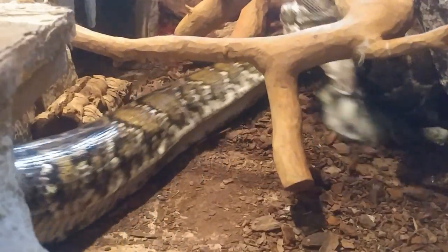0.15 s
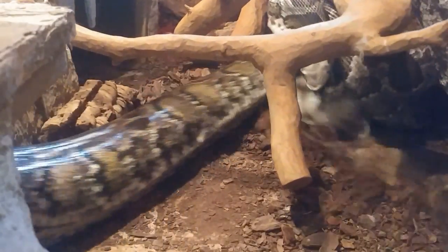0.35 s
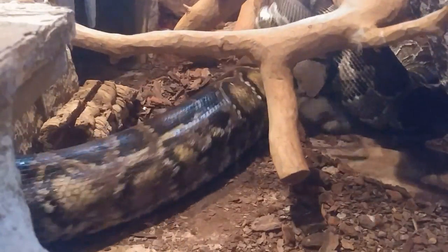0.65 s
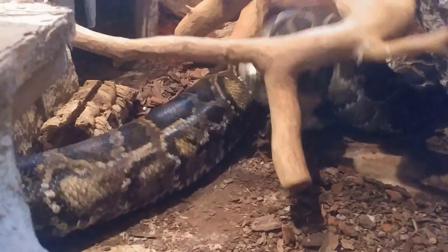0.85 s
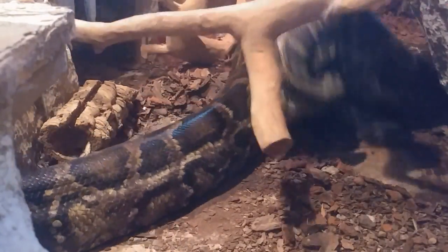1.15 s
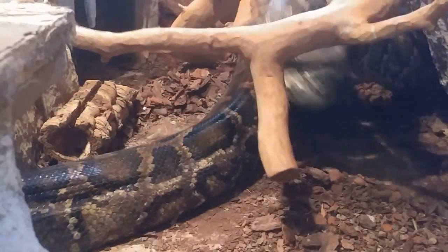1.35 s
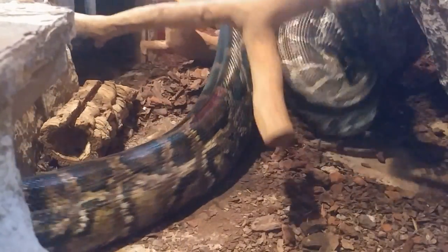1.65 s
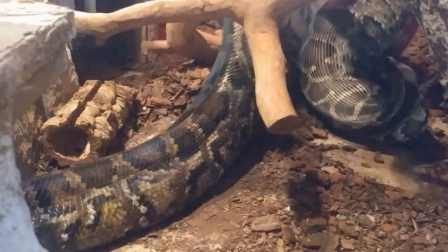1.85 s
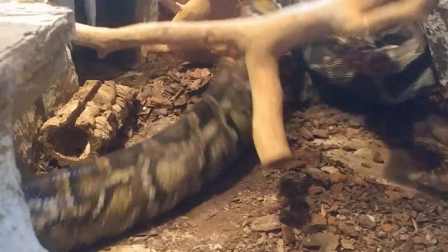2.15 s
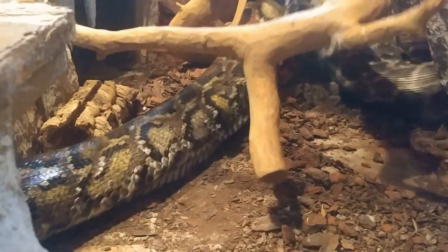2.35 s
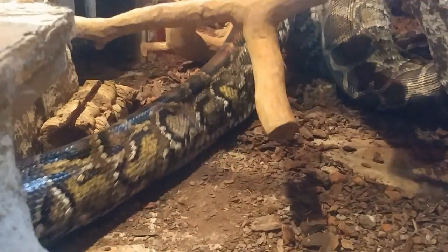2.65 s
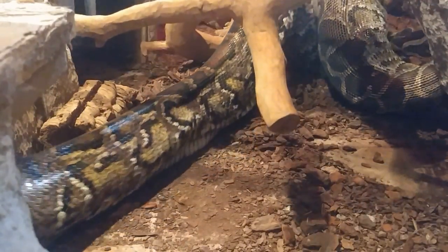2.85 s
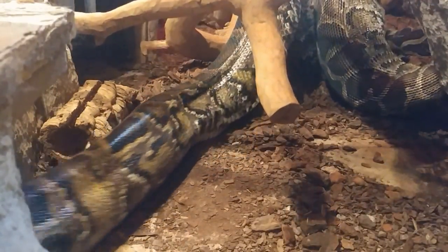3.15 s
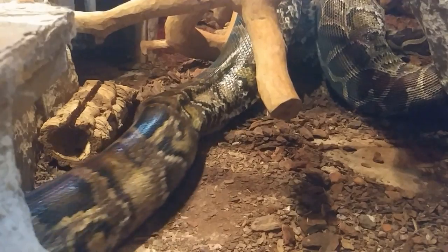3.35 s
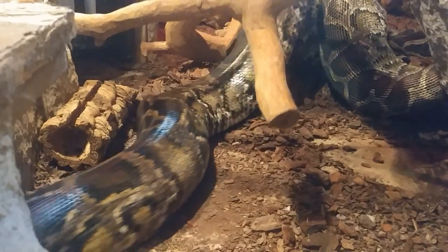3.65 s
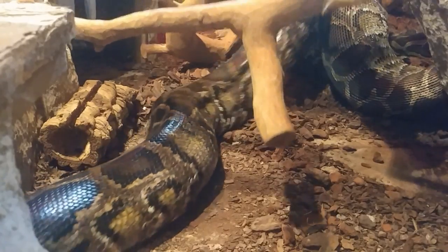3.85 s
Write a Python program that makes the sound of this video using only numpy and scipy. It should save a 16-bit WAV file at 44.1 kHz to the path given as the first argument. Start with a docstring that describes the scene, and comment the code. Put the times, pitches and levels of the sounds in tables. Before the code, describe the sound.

A rabbit squeals in harsh, high cries over thumps and rustling inside a terrarium.

```python
"""Inside a terrarium, a rabbit squeals in harsh, high cries while a python coils round it.
Each cry cracks open rough, holds a wavering pitch and breaks up as the vocal folds beat unevenly,
ringing between the close walls. The struggling bodies thump the cabinet and drag along a panel.
Scales slide and swish, kicks scuff the bark chips, and pieces of bark snap."""
import sys
import numpy as np
from scipy import signal
from scipy.fft import rfft, irfft, next_fast_len
from scipy.io import wavfile
from scipy.ndimage import uniform_filter1d, minimum_filter1d

SR = 44100
rng = np.random.default_rng(int(sys.argv[2]) if len(sys.argv) > 2 else 0)


def materialize(psi):
    """Save the field psi as 16-bit PCM at rate SR to the path in sys.argv[1].

    A 1-D psi becomes a single channel; in a 2-D psi each row is a channel.
    """
    bounded = np.clip(np.atleast_2d(psi).T, -1, 1)
    quanta = np.round(bounded * 32767).astype(np.int16)
    wavfile.write(sys.argv[1], SR, quanta)


N = 176400
TIME = np.arange(N) / SR
CUTOFF_HZ = 15700

# Levels in all tables are relative.
# Noise spectra. Each row: frequency in Hz, gain in dB.
FLOOR_SPECTRUM = [(20, -41), (48, -10), (125, 8), (200, -9.5), (2000, -33), (15000, -65)]
BARK_SPECTRUM = [(70, -8.5), (220, 5.5), (400, -0.5), (820, 3.5), (4200, -13), (15000, -14.5)]
SWISH_SPECTRUM = [(5000, -38), (12000, 3), (15000, -1)]
# Stereo image of the noise. Each row: frequency in Hz, left-right correlation.
CORRELATION = [(60, 1), (300, 0.76), (1200, 0.18), (15000, 0.33)]
# Close walls. Each row: left delay in ms, right delay in ms, gain.
WALL_ECHOES = [(1.9, 2.25, 0.85), (4.4, 3.4, -0.37), (7.1, 13, 0.53)]
# Scales sliding over chips; a body dragging along a panel. Each row: time in seconds, level in dB.
RUSTLE_LEVELS = [(0, -27.5), (.4, -31.5), (.62, -24.5), (.75, -34.5), (.95, -44), (1.2, -27.5),
                 (1.5, -25.5), (1.8, -37), (2.05, -30.5), (2.95, -38.5), (3.42, -49.5), (4, -38.5)]
DRAG_LEVELS = [(0, -50), (1.2, -47), (1.38, -34), (1.58, -31), (1.8, -43), (2.02, -36), (2.15, -35),
               (2.33, -26), (2.55, -35), (2.7, -48)]
# Kicks in the bark. Each row: start in seconds, level in dB, attack and decay in seconds, low-pass in Hz.
SCUFFS = [(0.562, -18.5, 0.00099, 0.032, 2200), (1.042, -24, 0.0059, 0.11, 434),
          (1.184, -24, 0.01, 0.11, 1090), (1.439, -14.5, 0.037, 0.046, 1300),
          (1.962, -27.5, 0.094, 0.043, 710)]
# Coils whipping past each other. Each row: start in seconds, level in dB, attack and decay in seconds.
SWISHES = [(.365, -27.5, .03, 0.13), (1.248, -20.5, .01, 0.033), (1.31, -18.5, 0.031, 0.025)]
# Bark breaking. Each row: start in seconds, level in dB, ring frequency in Hz.
SNAPS = [(0.397, -14.5, 6700), (0.554, -9.5, 2490), (0.555, -12, 1380), (0.5634, -20, 4700),
         (0.57, -22, 2980), (0.586, -13, 1200), (0.694, -17, 2240), (1.461, -18.5, 4900),
         (1.471, -19, 3580)]
# Blows on the cabinet. Each row: start in seconds, level in dB, low-pass in Hz, grind decay in seconds.
THUMPS = [(0, -15, 79.4, 0.048), (1.073, 0.5, 76.4, 0.018), (1.111, -2, 81, 0.0096),
          (1.147, -3, 107, 0.049), (1.257, -17, 304, 0.12), (1.332, -15, 260, 0.16),
          (1.481, -8, 118, 0.073), (1.999, -22, 162, 0.19)]
# Panel resonances. Each row: frequency in Hz, gain in dB, T60 in seconds.
CABINET_MODES = [(50.7, -44, 0.56), (74, -4.5, 0.49), (90.3, 1, 0.16), (126, -2, 0.11), (198.4, -2.5, 0.28),
                 (243.4, -9.5, 0.41)]
# Cries, one list per cry; the grunt is low and hoarse.
# Each row: time in seconds, pitch in Hz, level in dB, overtones in dB, roughness (0 clear, 1 full).
SCREAMS = [
    [(0, 1679, -9.5, -2.5, 0.28), (.03, 1589, -16, -16.5, 0.37), (.064, 1634, -28.5, 14, 0.42),
     (.073, 1829, -7, -15, .36), (.12, 1950, -16, -17.5, 0.65), (.19, 1787, -14.5, -12.5, 0.66),
     (.25, 1558, -19.5, -10, 0.84), (.315, 1261, -31.5, -51, 1.1)],
    [(1.248, 1050, -13, -3, 0.7), (1.258, 1358, -20, 2, 0.5), (1.277, 1543, -8, -2, 0.12),
     (1.295, 1590, -23.5, -4, 0.2), (1.315, 1569, -19, 38, 0.55), (1.35, 1391, -30, 5, 0.88),
     (1.4, 1116, -42, -4, 0.45)],
    [(1.5, 1389, -27, -5, 1.04), (1.525, 1541, -17.5, -7.5, 0.67), (1.55, 1406, -19.5, -11.5, 0.89),
     (1.585, 1664, -11, -4.5, 0.64), (1.65, 1704, -14, -2, 1.13), (1.69, 1699, -8.5, -4.5, 0.32),
     (1.715, 2081, -7, -10, 0.63), (1.77, 1771, -5.5, -3.5, 0.55), (1.89, 1726, -10, -6, 0.53),
     (1.93, 1867, -16, 1, 0.58), (2.01, 1840, -20.5, -19.5, 0.36), (2.04, 1708, -24, 23, 0.88)],
    [(2.04, 982, -28, -13, 0.5), (2.065, 1545, -3, -13, 0.28), (2.115, 1696, -20, 1.5, .42),
     (2.145, 1613, -3, -8, 0.5), (2.2, 1716, -14.5, 9.5, 0.57), (2.31, 1779, -16, -11, 0.47),
     (2.35, 1619, -9, -1.5, 0.5), (2.385, 2050, -15, -6, 0.85), (2.45, 1979, -19, -14, 1.14),
     (2.5, 1745, -39, -28, 0.98)],
]
GRUNTS = [
    [(.41, 463.4, -27, 2, 0.52), (.44, 500, -21, -7, 0.7), (.535, 481, -34, -30, 0.55)],
]
WHIMPERS = [
    [(.74, 1244, -36, 34, 0.31), (.785, 1440, -27.5, -42, 0.8), (.82, 1680, -28.5, 8.5, 0.19),
     (.88, 1600, -43, -18, 0.66)],
    [(.895, 1313, -32, 4, 0.099), (.955, 1207, -33.5, 5, 0.49), (1.085, 1284, -26, 12.5, 0.19),
     (1.115, 1440, -16.5, 6, 0.21), (1.14, 1429, -33, 24, 0.62), (1.18, 1123, -28, 10, 0.38)],
]
WAILS = [
    [(2.595, 953, -26.5, 29, 1), (2.63, 1554, -13.5, 5, 0.27), (2.66, 1737, -16, -2, 0.2),
     (2.71, 1663, -13.5, 2, .36), (2.76, 1522, -6.5, -8, 0.28), (2.83, 1558, -16.5, -7.5, 0.075),
     (2.87, 1406, -22.5, 5, 0.48), (2.92, 1146, -45, -25, 0.8)],
    [(3.016, 855, -26.5, 31, 0.99), (3.039, 1149, -17, 5, 0.63), (3.06, 1386, -24.5, 10.5, 0.6),
     (3.11, 1428, -20, -5, .1), (3.16, 1430, -14, 0, 0.048), (3.19, 1356, -19, 1, 0.19),
     (3.22, 1460, -17.5, -5, 0.064), (3.29, 1374, -16.5, -1.5, 0.18), (3.32, 1167, -25.5, 5.5, 0.82),
     (3.38, 1040, -85, -9, 0.52)],
    [(3.472, 760, -37, -3.5, 0.91), (3.5, 1051, -19.5, 8, 0.65), (3.525, 1401, -16.5, 0.5, 0.57),
     (3.575, 1346, -9, 0.5, 0.17), (3.63, 1392, -9.5, 5.5, 0.14), (3.68, 1366, -12.5, -9.5, 0.1),
     (3.72, 1346, -18, -9, 0.048), (3.765, 1404, -14.5, -2, 0.026), (3.8, 1265, -24, 8, 0.32),
     (3.85, 1191, -25, 1.5, 0.22), (3.9, 1023, -58.5, -23, 0.49)],
]
# Throat and mouth resonances per kind of cry. Each row: frequency in Hz, gain in dB.
SCREAM_THROAT = [(400, -19), (1200, -9.5), (1550, 3.5), (2080, 1), (2600, 0.5), (3300, -5), (4000, -9),
                 (5100, -10.5), (6500, -8.5), (7400, -17), (8700, -12.5), (10000, -25.5), (13000, -20),
                 (15000, -22)]
GRUNT_THROAT = [(480, -41), (950, -6.5), (1500, 7.5), (2000, -12), (2600, -12), (4000, -29), (6000, -20.5)]
WHIMPER_THROAT = [(400, -5), (1250, 15.5), (1650, 11), (2700, 6.5), (3700, -15), (5700, -13), (7000, -33)]
WAIL_THROAT = [(400, -28), (850, 0.5), (1350, 9.5), (2400, 10), (2800, -6.5), (3100, -4.5), (3600, -19),
               (4300, -5.5), (5600, -4.5), (6200, -16.5), (7500, -22.5), (8400, -16.5), (11500, -31.5),
               (12500, -9), (15500, -27)]
# Microphone responses. Each row: frequency in Hz, gain in dB.
MIC_LEFT = [(1500, 3), (5000, 4), (6500, 4), (7700, -4.5), (10000, -1.5), (10600, -27), (11200, -2)]
MIC_RIGHT = [(1500, 1.5), (5000, 8), (9200, 12), (10000, -1), (10600, -23), (11500, -4)]


def from_db(db):
    return 10 ** (np.asarray(db) / 20)


def unit_rms(x):
    return x / np.sqrt(np.mean(x ** 2) + 1e-20)


def running_rms(x, size):
    return np.sqrt(np.abs(uniform_filter1d(x ** 2, size)) + 1e-12)


def interpolate(rows, t=TIME):
    times_s, *columns = np.transpose(rows)
    return [np.interp(t, times_s, column) for column in columns]


def shaped(x, points, to_gain=from_db):
    """Filter by a curve over log frequency."""
    n = x.shape[-1]
    size = next_fast_len(n + 2048)
    hz, value = np.transpose(points)
    curve = np.interp(np.log(np.fft.rfftfreq(size, 1 / SR) + 1), np.log(hz), value)
    return irfft(rfft(x, size) * to_gain(curve), size)[..., :n]


def low_pass(x, hz):
    return signal.sosfilt(signal.butter(2, hz, fs=SR, output="sos"), x + 1e-18)


def drift(rate_hz, size=N):
    """Smooth random motion, RMS 1."""
    return unit_rms(low_pass(rng.standard_normal(size + SR // 2), rate_hz)[SR // 2:])


def swell(start_s, db, attack_s, decay_s):
    """Linear rise, exponential fall."""
    rise = np.clip((TIME - start_s) / attack_s, 0, 1)
    return from_db(db) * rise * np.exp(-np.maximum(TIME - start_s - attack_s, 0) / decay_s)


def stereo_noise(spectrum, envelope=1):
    """Coloured noise, channels alike in the bass, RMS 1."""
    white = envelope * rng.standard_normal((2, N))
    mid = shaped(white[0], CORRELATION, lambda c: np.sqrt(1 + c))
    side = shaped(white[1], CORRELATION, lambda c: np.sqrt(1 - c))
    return unit_rms(shaped(np.array([mid + side, mid - side]), spectrum))


def noise_floor():
    """Faint, steady rumble."""
    return from_db(-43) * stereo_noise(FLOOR_SPECTRUM)


def terrarium(x, low_t60_s=0.38, treble_t60_s=0.27, tail_db=6.5, left_lag_ms=0.17):
    """Direct sound, three close walls and a diffuse ring whose treble dies first."""
    t = TIME[:SR // 2]
    white = rng.standard_normal((2, len(t)))
    low = low_pass(white, 1330)
    tail = low * from_db(-60 * t / low_t60_s) + (white - low) * from_db(-60 * t / treble_t60_s)
    response = from_db(tail_db) * unit_rms(tail * (t > .004)) / np.sqrt(len(t))
    for left_ms, right_ms, gain in [(left_lag_ms, 0, 1)] + WALL_ECHOES:
        delay_s = np.array([[left_ms], [right_ms]]) / 1000
        response += gain * np.sinc((t - delay_s) * SR)
    return signal.fftconvolve(x[None], response, axes=1)[:, :N]


def chips(spectrum, bursts_per_s=900, spread_db=3.5, decay_s=0.00062):
    """Bark chips crunch together in tiny bursts over a smooth sliding hiss."""
    sizes = from_db(spread_db * np.minimum(rng.exponential(1, N), 5))
    impacts = sizes * (rng.random(N) < bursts_per_s / SR)
    bursts = signal.lfilter([1], [1, -np.exp(-1 / (decay_s * SR))], impacts + 1e-18)
    return stereo_noise(spectrum, envelope=1 + unit_rms(bursts))


def bedding():
    """Chips rustle under the coils, kicks scuff them, scales swish."""
    rustle = from_db(interpolate(RUSTLE_LEVELS)[0]) * chips(BARK_SPECTRUM)
    grit = chips(BARK_SPECTRUM)
    scuffs = sum(swell(*shape) * unit_rms(low_pass(grit, hz)) for *shape, hz in SCUFFS)
    swishes = sum(swell(*row) for row in SWISHES) * chips(SWISH_SPECTRUM)
    return rustle + scuffs + swishes


def bark_snaps(t60_cycles=11.6):
    """Each piece cracks and rings briefly at its own pitch."""
    out = np.zeros(N)
    for start_s, db, hz in SNAPS:
        start = int(start_s * SR)
        cycles = hz * TIME[:SR // 20]
        envelope = from_db(db - 60 * cycles / t60_cycles)
        out[start:start + len(cycles)] += envelope * np.sin(2 * np.pi * cycles)
    return out


def panel_drone(hz=49, flutter_db=2):
    """A dragging body keeps the panel droning unsteadily."""
    tone = np.sqrt(2) * np.sin(2 * np.pi * hz * TIME + 0.54 * drift(17))
    return tone * from_db(interpolate(DRAG_LEVELS)[0] + flutter_db * drift(6.5))


def cabinet_thumps(trim_db=-5, grind_gain=.018):
    """Soft blows with a grinding follow-through ring the panels."""
    force, out = np.zeros(N), np.zeros(N)
    for start_s, db, hz, decay_s in THUMPS:
        start = int(start_s * SR)
        push = grind_gain * rng.standard_normal(N) * np.exp(-TIME / decay_s)
        push[0] = 1  # the impact
        force[start:] += from_db(db + trim_db) * low_pass(push[:N - start], hz)
    for hz, db, t60_s in CABINET_MODES:
        radius, angle = from_db(-60 / (t60_s * SR)), 2 * np.pi * hz / SR
        out += from_db(db) * signal.lfilter([1, -1], [1, -2 * radius * np.cos(angle), radius ** 2], force)
    return out


def cry(rows, throat, rasp_db):
    """Vocal folds beat unevenly in fits of roughness; throat and mouth filter their tone and rasp."""
    jitter_depth, jitter_hz, waver_depth, waver_hz = 0.0885, 409, 0.00561, 56.6
    fray_db, flicker_db, shimmer_db, flutter_db, trim_db = 2, 2.5, 2.5, 2, 0.5
    span = (TIME >= rows[0][0]) & (TIME < rows[-1][0])
    n = span.sum()
    hz, db, overtones_db, rough = interpolate(rows, TIME[span])
    rough = np.clip(rough * from_db(fray_db * drift(29, n)), 0, 1) ** 1.4  # break-up sets in late
    wobble = jitter_depth * rough * drift(jitter_hz, n) + waver_depth * drift(waver_hz, n)
    phase = 2 * np.pi * np.cumsum(hz * (1 + wobble)) / SR
    overtones = sum(np.cos(k * phase) * (k * hz < CUTOFF_HZ) * from_db(flicker_db * drift(11.2, n))
                    for k in range(2, 12))
    overtones *= np.exp(-1.42 * rough)  # overtones give way to rasp
    air_pulses = 2 * (1 + np.cos(phase))
    rasp = from_db(rasp_db) * (.015 + rough) * rng.standard_normal(n) * air_pulses
    folds = np.cos(phase) + from_db(overtones_db) * (overtones + rasp)
    folds *= 1 + 0.26 * rough * np.cos(phase / 2)  # subharmonic
    folds *= from_db(shimmer_db * rough * drift(jitter_hz, n))
    voice = shaped(folds, throat)
    level = from_db(db + trim_db + flutter_db * drift(37, n))  # the strained voice trembles
    fades = signal.windows.tukey(n, min(1, 400 / n))
    out = np.zeros(N)
    out[span] = voice / running_rms(voice, size=700) * level * fades
    return out


def rabbit():
    """All cries, each kind with its own mouth shape and rasp."""
    return (sum(cry(rows, SCREAM_THROAT, rasp_db=-1.5) for rows in SCREAMS)
            + sum(cry(rows, GRUNT_THROAT, rasp_db=-4) for rows in GRUNTS)
            + sum(cry(rows, WHIMPER_THROAT, rasp_db=-4) for rows in WHIMPERS)
            + sum(cry(rows, WAIL_THROAT, rasp_db=-7.5) for rows in WAILS))


def scene():
    """Stereo mix; only cries and snaps echo off the walls."""
    snaps = bark_snaps()
    mix = noise_floor() + terrarium(rabbit() + snaps) + snaps + bedding()
    cabinet = cabinet_thumps() + panel_drone()
    return mix + cabinet * from_db([[.5], [-.5]])  # slightly left


def record(dry, limit_db=2, release_db_per_s=138):
    """Microphone colour, low cut, fast limiter, soft clip, top cut."""
    x = np.array([shaped(dry[0], MIC_LEFT), shaped(dry[1], MIC_RIGHT)])
    x = signal.sosfilt(signal.butter(4, 38, "high", fs=SR, output="sos"), x)
    over_db = np.maximum(20 * np.log10(np.abs(x).max(axis=0) + 1e-9) - limit_db, 0)
    release_db = release_db_per_s * TIME
    held_db = np.maximum.accumulate(over_db + release_db) - release_db
    x *= from_db(uniform_filter1d(minimum_filter1d(-held_db, size=81), size=81))
    x = .98 * x / (1 + x ** 8) ** (1 / 8)
    return shaped(x, [(CUTOFF_HZ, 0), (CUTOFF_HZ + 200, -80)])


dry = scene()
out = record(dry)
materialize(out)
```